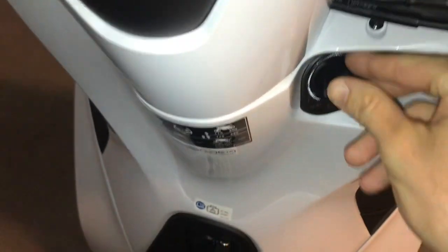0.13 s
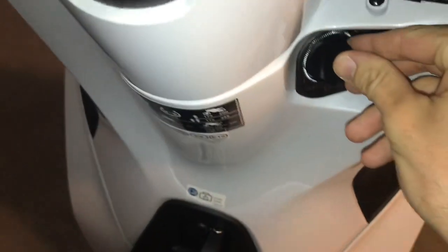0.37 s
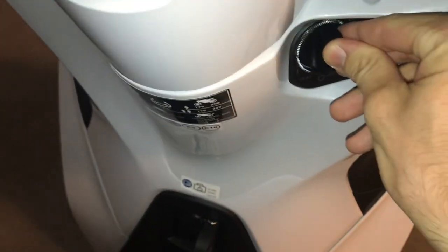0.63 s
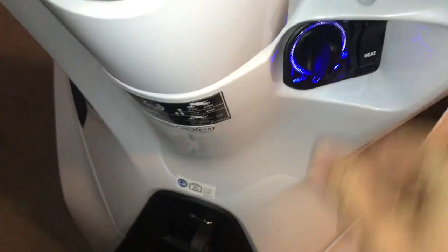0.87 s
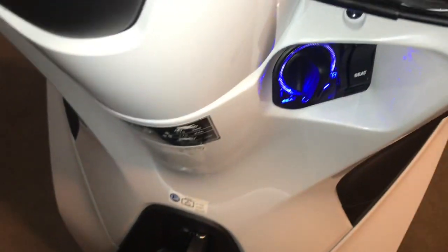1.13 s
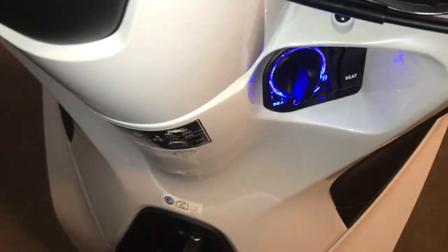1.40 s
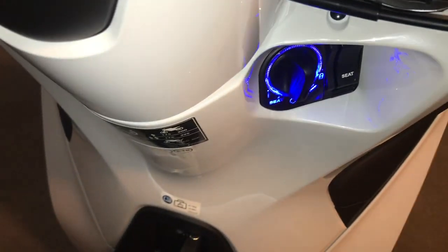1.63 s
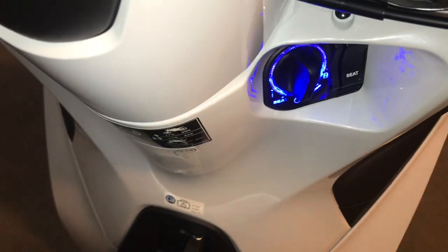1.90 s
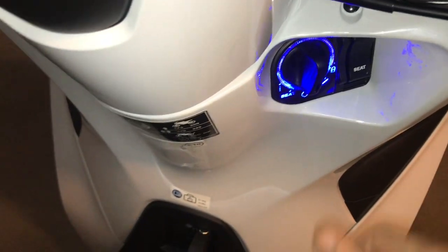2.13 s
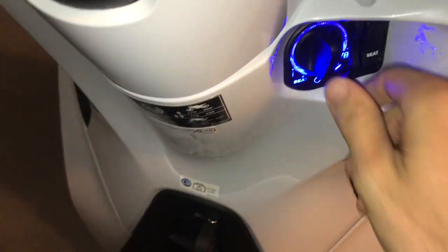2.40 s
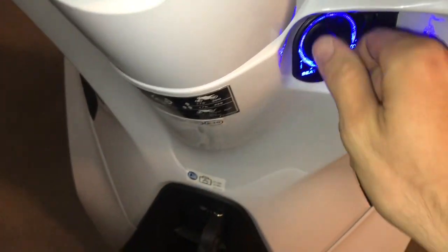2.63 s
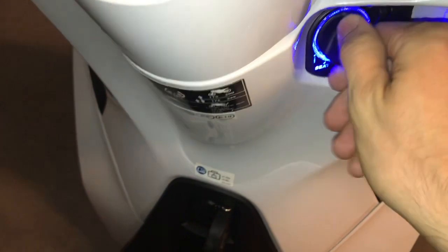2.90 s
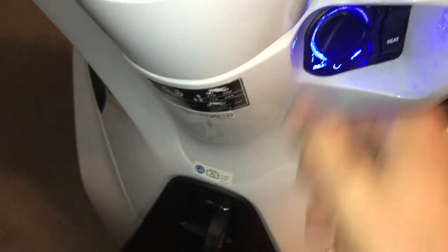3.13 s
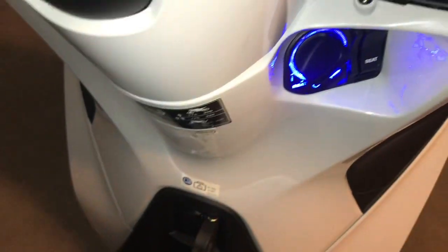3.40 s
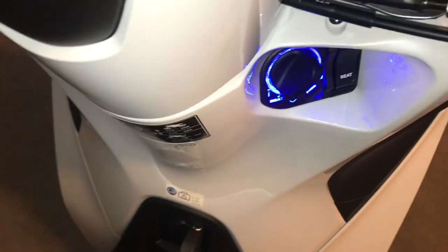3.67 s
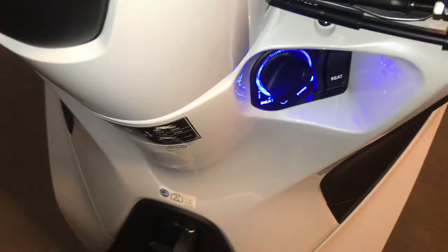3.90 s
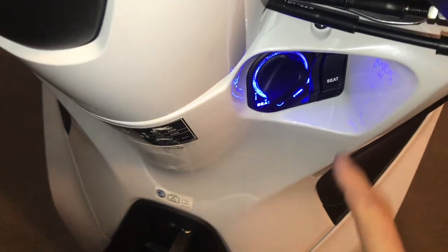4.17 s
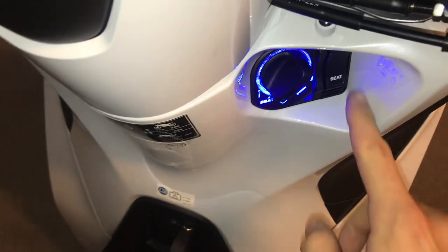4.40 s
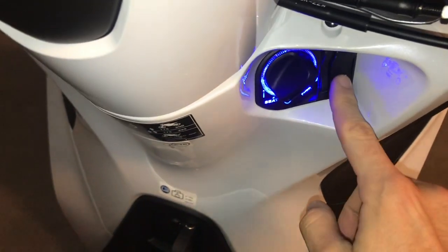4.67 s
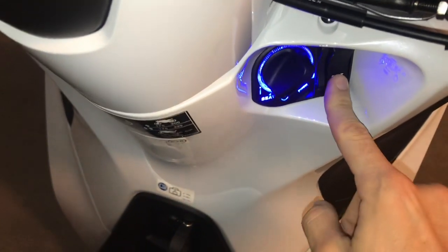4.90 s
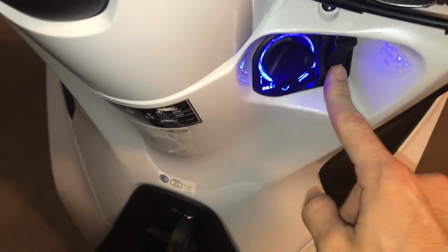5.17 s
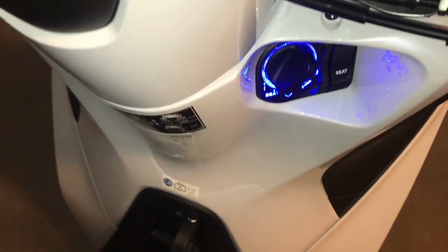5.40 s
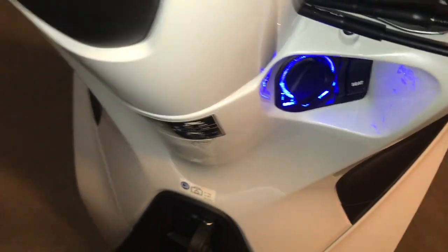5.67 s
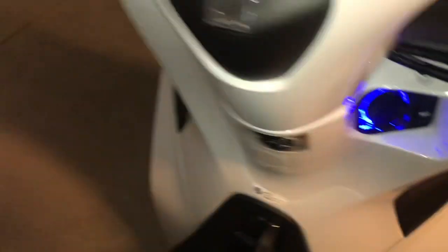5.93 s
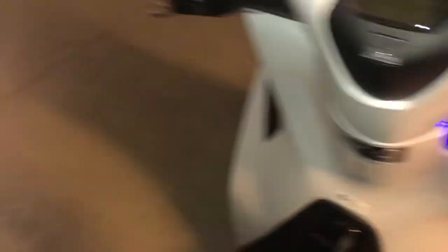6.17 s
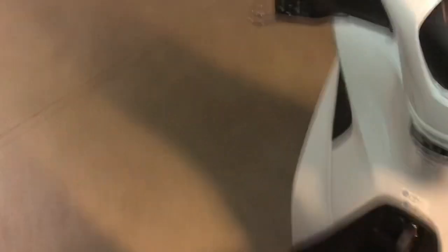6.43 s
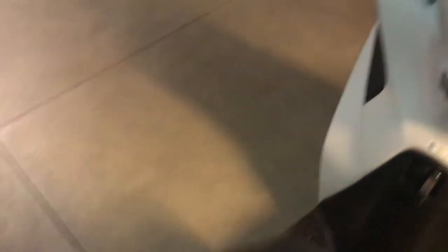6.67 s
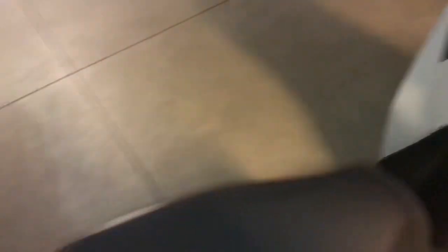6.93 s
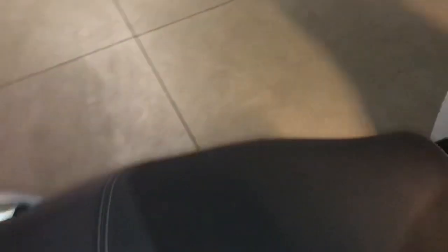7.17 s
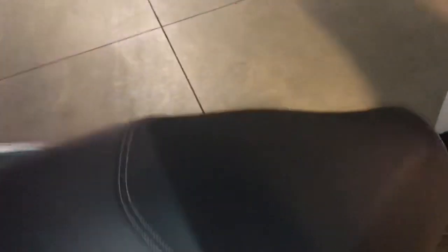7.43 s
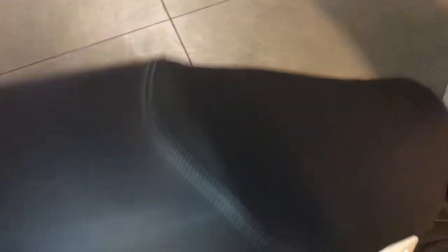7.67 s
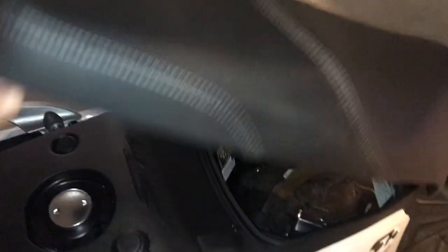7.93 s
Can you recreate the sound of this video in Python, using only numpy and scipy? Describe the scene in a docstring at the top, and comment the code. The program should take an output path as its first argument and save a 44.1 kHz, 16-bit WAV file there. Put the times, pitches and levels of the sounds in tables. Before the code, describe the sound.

A quiet bare garage, heard through one close handheld microphone: very faint distant engine drone, low hum, soft noise and light sleeve rustle. After a tiny touch at 0.2 s, a plastic ignition knob is pushed at about 0.65 s with a sharp click, then turned at 0.8 s with a louder, brighter cluster of clacks; a faint rasp and diffuse room tail fade. Quiet until 2.95-3.0 s, when two more hard clicks turn the knob again. Faint taps come at 4.65-4.75 s. At 5.05 s the seat latch snaps, loudest and fullest, with a springy metallic hiss and a short rub; the button clicks back at 5.3 s. Cloth rustles from 5.5 s, soft knocks and a dull bump fall at 6.2-6.5 s. From 6.6 to 8 s come brushing strokes, rough rubs, low thumps, a brief falling squeak at 7.15 s and a light clack at 7.4 s.

```python
"""In a bare garage, a distant drone, hum and noise floor (shaped noise) run under a sleeve's rustle (flickering noise).
A hand pushes and turns a scooter's plastic ignition knob: clattering contacts ring decaying modes, rasps follow,
and the room answers each click with a soft tail of diffuse noise. Near 5 s the seat button clicks and the latch snaps;
then the seat is lifted: dull low tones, rough rubs of broad noise, strokes on its cover and a falling squeak.
One microphone feeds both channels."""
import sys
import numpy as np
from scipy import signal
from scipy.fft import rfft, irfft
from scipy.io import wavfile
from scipy.ndimage import map_coordinates

SR = 44100
rng = np.random.default_rng(int(sys.argv[2]) if len(sys.argv) > 2 else 0)


def decibels_to_gain(level_db):
    """Convert a level in decibels to a linear amplitude gain (20 dB per decade)."""
    exponent = np.asarray(level_db, float) / 20
    return 10 ** exponent


def bounce(signal):
    """Save signal as a 16-bit WAV file at the path given by the first command-line argument."""
    frames = np.transpose(np.atleast_2d(signal))
    limited = np.clip(frames, -1, 1)
    pcm = np.round(limited * 32767).astype(np.int16)
    wavfile.write(sys.argv[1], SR, pcm)


N = 355446   # samples

# Distant engine drone. Each row: time in seconds, centre in Hz, level in dB.
DRONE = [(0, 66, -64.5), (1.3, 64, -64), (2.5, 76, -64.5), (3.5, 85, -63.5), (4.1, 88, -59.5),
         (4.6, 96, -65.5), (5.0, 102, -61), (6.0, 78, -68.5), (6.6, 67.6, -64.5), (7.5, 71.4, -59.5),
         (8.06, 69, -62)]
DRONE_WAVER_DB = 1
# Distant machinery.
HUM_HZ, HUM_DB, HUM_WAVER_DB = 119, -70, 4.5
# Steady noise floor. Each row: frequency in Hz, relative spectrum level in dB.
FLOOR_SPECTRUM = [(18, -50), (30, -10), (46, -3), (86, -2.5), (134, -9), (153, -18.5), (303, -21.5),
                  (473, -29), (540, -21.5), (649, -20.5), (1130, -18), (1590, -27), (1720, -29.5),
                  (2830, -42.5), (3400, -47), (16000, -52.5)]
FLOOR_DB = -66
HANDLING_DB = -64.5   # hand on the microphone, at rest
# Grip shifts. Each row: start in seconds, length in seconds, level in dB at full swell.
GRIP_SHIFTS = [(6.136, 0.39, -71.5), (6.924, 0.19, -61.5), (7.313, 0.096, -56), (7.438, 0.17, -55),
               (7.883, 0.23, -70.5)]
# Sleeve movements. Each row: time in seconds, fine hiss level in dB.
SLEEVE_MOVES = [
    [(0.0, -64.5), (0.38, -70.5), (0.55, -71)],
    [(1.24, -68), (1.286, -74), (1.988, -79.5), (2.224, -75.5), (2.404, -70.5), (2.516, -68), (2.69, -71.5),
     (2.9, -73.5)],
    [(3.43, -67.5), (3.666, -76.5), (4.01, -78), (4.224, -74), (4.466, -75), (4.702, -77.5), (4.93, -76),
     (5.0, -69)],
    [(5.5, -66), (5.706, -63.5), (5.84, -66), (6.23, -69.5), (6.43, -71)],
    [(6.88, -62.5), (7.0, -64)],
    [(7.46, -69), (7.66, -65)],
    [(8.0, -65.5), (8.06, -69)],
]
# Dull part of the rustle. Each row: frequency in Hz, relative spectrum level in dB.
SWISH_SPECTRUM = [(300, -15), (600, -3.5), (1500, 0), (3000, -3.5), (6000, -5.5), (9000, -16), (16000, -24)]
# Bright part of the rustle. Each row: frequency in Hz, relative spectrum level in dB.
HISS_SPECTRUM = [(2500, -33), (5000, -10.5), (8000, -3.5), (11500, -2), (15000, -1.5), (16500, -8)]
SWISH_OVER_HISS_DB = 5   # sleeve, at its mean level
SWISH_FOLLOWS = 0.96   # share of the sleeve hiss's swing in dB
# Hand and clothes on the seat cover. Each row: start in seconds, length in seconds,
# swish level in dB, fine hiss level in dB, both at full swell.
SEAT_STROKES = [(6.52, 0.1, -70, -64), (6.606, .24, -58.5, -48), (7.022, 0.37, -54.5, -48.5),
                (7.36, 0.18, -57.5, -83), (7.7, 0.1, -63.5, -67), (7.827, 0.16, -61.5, -57),
                (7.974, 0.39, -75, -87)]
STROKE_PEAKEDNESS = 0.87   # power of the half-sine swell
STROKE_GRAB_S = 0.0066
STROKE_HEAD_START = 0.084   # share of the half sine skipped at the start
# Contacts on the knob-and-button panel. Each row: start in seconds, knock in dB, thud over knock in dB,
# hardness in dB gained per brighter family of modes, clatter decay in ms (limited to 8).
KNOB_CONTACTS = [(0.158, -58.5, 9, 3.5, 8.7), (0.5751, -47.5, -7, -0.5, 8), (0.6115, -44, -2, 4, 7.4),
                 (0.6572, -17.5, -11.5, -13.5, 4.4), (0.803, -21.5, -20, 8.5, 2.8),
                 (0.8045, -29.5, -6.5, 10.5, 3.7), (0.8062, -14, -10.5, -5, 2.9),
                 (0.837, -23, -9.5, -1.5, 4.4), (0.848, -35.5, 9, -1, 6.1), (2.9238, -47, -21, 3.5, 14),
                 (2.936, -49, -4, 3, 3), (2.9505, -34, -17, 7, 7), (2.953, -22.5, -26, 4, 6.5),
                 (2.9952, -18, -9.5, -1, 8.7), (2.9985, -23.5, -3.5, 8.5, 2.3), (3.004, -37.5, 12, -6, 1.8),
                 (4.652, -40, -3.5, -15, 13), (4.751, -49.5, -10, -13, 8.7), (5.2934, -37.5, -3.5, -2, 6),
                 (5.31, -35, -10, -16, 3.7), (5.318, -16.5, -18.5, -6, 4.2), (5.3205, -23, -7.5, -8, 6.4),
                 (5.336, -42.5, 5, -8, 2.2)]
# Contacts in the seat latch. Each row: columns as in KNOB_CONTACTS.
LATCH_CONTACTS = [(5.0424, -36, 1, -5, 8), (5.0535, -11.5, -10.5, 0.35, 4.2), (5.0552, -15, -6.5, -1, 6.3),
                  (5.06, -21, -24, -3, 9.9)]
# Contacts on seat and clothes. Each row: columns as in KNOB_CONTACTS.
SEAT_CONTACTS = [(0.363, -78, -5, 13.5, 1.5), (1.3638, -75.5, -3, 10, 1.9), (1.564, -59, 8, -2.5, 4.2),
                 (2.0418, -78, 5, 12, 3), (4.05, -67, 0, 7, 3), (6.201, -53.5, 3, 8.5, 3),
                 (6.44, -49, -3, -2, 3.8), (6.457, -45.5, -4, -1, 6.8), (6.4685, -52, 2.2, 7, 8.7),
                 (6.48, -36.5, 3.5, 1, 6.9), (6.493, -30.5, 6.5, -2.5, 2.6), (7.0264, -61, 23, 9.5, 4),
                 (7.3672, -41.5, -7, -1, 3.4), (7.4011, -29, -10, 1, 20)]
# Modes of the knob panel. Each row: frequency in Hz, level in dB within its family,
# t60 in seconds (limited by plastic loss).
PANEL_MODES = [(226.4, -0.5, 0.094), (296, -0.5, 0.091), (399, 2.5, 0.091), (500, 1, 0.066),
               (629, 8.5, 0.044), (790, -12.5, 0.016), (1020, -6, 0.037), (1150, -7.5, 0.026),
               (1383, 5.5, 0.014), (1517, -5.5, 0.013), (1803, -3.5, 0.02), (2380, -6, 0.012),
               (2800, -5, 0.0052), (3290, -0.5, .012), (3897, -2.5, 0.0095), (4530, -0.5, .006),
               (5270, -0.5, 0.0045), (6410, -8, 0.0024), (7280, -2.5, .008), (8700, -5, 0.014),
               (9340, -3, 0.0044), (12470, -1.5, .005), (15000, -5.5, .004)]
# Modes of the latch. Each row: columns as in PANEL_MODES.
CATCH_MODES = [(98, -1, 0.097), (150, 14.5, 0.05), (235, 12.5, 0.042), (334, 16, 0.035), (520, -1, 0.055),
               (654, 3.5, 0.045), (997, 7, 0.011), (1175, 8.5, 0.01), (1477, 8.5, 0.0099),
               (1990, 6.5, .025), (2710, 6, 0.011), (3750, 13, 0.0058), (5250, 11, 0.0028),
               (5500, -1, 0.0047), (6120, -5, .006), (7760, -0.5, .008), (8900, 8, .01), (9700, -5, .006),
               (10900, 0, .005), (14500, -29, .004)]
# Modes of the seat. Each row: columns as in PANEL_MODES.
CUSHION_MODES = [(176, -12, 0.045), (304, -7.5, 0.022), (610, 10, 0.013), (975, -1, 0.019),
                 (1500, 7, 0.007), (2150, -3, 0.036), (3040, 13, 0.0036), (4320, 1.5, 0.0065),
                 (5800, 5.5, 0.0045), (6940, 4, 0.002), (8560, 8, 0.018), (11600, 5, 0.0074),
                 (14900, 7, 0.0036)]
# Borders in Hz between thud, knock, snap and tick modes.
FAMILY_BORDERS_HZ = [700, 2600, 6000]
# Room response. Each row: frequency in Hz, t60 in seconds, level in dB.
ROOM_BANDS = [(100, 0.75, -2), (300, 0.67, -9), (704, 0.97, -12.5), (1400, 1.5, -17.5), (2520, 0.85, -11.5),
              (5060, 1.1, -15.5), (9000, 0.54, -16), (15000, .8, -16.5)]
TAIL_DIP_S, TAIL_DIP_DB, TAIL_DIP_SPREAD_S = .11, -0.5, 0.014   # the tail dips briefly
TAIL_DROP_S, TAIL_DROP_DB = .41, -2   # the tail sinks suddenly this long after a click
# Parts rasping on after a click: knob detent and latch spring. Each row: start in seconds,
# starting level in dB, resonance in Hz, width in Hz, t60 in seconds.
RASPING_PARTS = [(0.166, -57.5, 1290, 500, 0.35), (0.666, -54, 1240, 320, 1.4),
                 (5.06, -42.5, 8900, 1500, 0.48), (5.06, -46, 5860, 1300, 0.7)]
# Dull bumps of body and seat. Each row: start in seconds, level in dB before decay and build-up,
# tone in Hz, t60 in seconds.
BODY_BUMPS = [(5.056, -39, 60, .11), (6.205, -31, 55.8, 0.075), (6.48, -38, 44.6, 0.13),
              (6.995, -39, 147, 0.13), (7.38, -43, 60, 0.14), (7.469, -42, 150, 0.12)]
# Broad rough rubs as the seat flexes and swings. Each row: start in seconds, length in seconds,
# level in dB at full swell, centre in Hz, width in Hz.
SEAT_RUBS = [(5.13, 0.19, -48.5, 2300, 2600), (5.734, 0.11, -58, 2800, 2400), (6.66, .05, -55, 6500, 3000),
             (7.07, 0.039, -49.5, 4190, 3000), (7.695, 0.15, -55.5, 2900, 1310),
             (7.836, 0.17, -55.5, 2955, 2200)]
SQUEAK_S, SQUEAK_LENGTH_S, SQUEAK_DB = 7.15, .11, -58
SQUEAK_START_HZ, SQUEAK_SAG_HZ_PER_S = 1830, 2600
# Dips of the microphone case. Each row: frequency in Hz, width in Hz, gain in dB.
CASE_DIPS = [(4998, 520, -3.5), (7770, 600, -2.5), (10460, 620, -8.5)]
TOP_CUT_HZ = 16050


def rms_one(x):
    """Scale to unit rms."""
    return x / np.sqrt(np.mean(x ** 2) + 1e-20)


def in_time(rows):
    """Each column after the time as a curve over the samples."""
    time_s, *columns = np.transpose(rows)
    return [np.interp(np.arange(N) / SR, time_s, column) for column in columns]


def at_hz(points, hz, column=1):
    """Read a table on a log-frequency axis."""
    points = np.array(points)
    return np.interp(np.log(hz + 1), np.log(points[:, 0]), points[:, column])


def drift(knots_per_s):
    """Smooth random curve through normal knots of spread 1."""
    knots = rng.standard_normal(400)
    return map_coordinates(knots, [np.arange(N) / SR * knots_per_s], order=3, mode="wrap")


def coloured(spectrum):
    """Noise with the given spectrum, rms 1."""
    hz = np.fft.rfftfreq(N, 1 / SR)
    white = rfft(rng.standard_normal(N))
    return rms_one(irfft(white * decibels_to_gain(at_hz(spectrum, hz)), N))


def wandering_band(hz, width_hz):
    """Noise around a centre that may move: a random complex envelope on a carrier."""
    pole = np.exp(-np.pi * width_hz / SR)
    real, imag = signal.lfilter([1], [1, -2 * pole, pole * pole], rng.standard_normal((2, N)))
    carrier = np.exp(2j * np.pi * np.cumsum(hz) / SR)
    return rms_one(np.real((real + 1j * imag) * carrier))


def stroke(start_s, length_s):
    """Envelope of one movement: it breaks loose, swells and stops."""
    since_s = np.arange(N) / SR - start_s
    progress = np.clip(since_s / length_s, 0, 1)
    swell = np.sin(np.pi * (STROKE_HEAD_START + (1 - STROKE_HEAD_START) * progress))
    return np.clip(since_s / STROKE_GRAB_S, 0, 1) * np.abs(swell) ** STROKE_PEAKEDNESS


def background():
    """Wavering low drone and hum as narrow noise, lumpy handling noise and a steady floor."""
    drone_hz, drone_db = in_time(DRONE)
    drone = decibels_to_gain(drone_db + DRONE_WAVER_DB * drift(7.1)) * wandering_band(drone_hz, width_hz=28)
    hum = decibels_to_gain(HUM_DB + HUM_WAVER_DB * drift(3.1)) * wandering_band(np.full(N, HUM_HZ), width_hz=23)
    grip = decibels_to_gain(HANDLING_DB)
    for start_s, length_s, level_db in GRIP_SHIFTS:
        grip = grip + decibels_to_gain(level_db) * stroke(start_s, length_s)
    rub = coloured([(80, -39.5), (140, 3.5), (300, -3.5), (700, -14.5), (1400, -42)])
    handling = grip * decibels_to_gain(2.5 * drift(18)) * rub
    return drone + hum + handling + decibels_to_gain(FLOOR_DB) * coloured(FLOOR_SPECTRUM)


def rustle():
    """Fabric fibres slipping: dense noise that flickers a little."""
    sleeve_db, = in_time(np.concatenate(SLEEVE_MOVES))
    mean_db = sleeve_db.mean()
    swish = decibels_to_gain(mean_db + SWISH_OVER_HISS_DB + SWISH_FOLLOWS * (sleeve_db - mean_db))
    hiss = decibels_to_gain(sleeve_db)
    for start_s, length_s, swish_db, hiss_db in SEAT_STROKES:
        envelope = stroke(start_s, length_s)
        swish = swish + decibels_to_gain(swish_db) * envelope
        hiss = hiss + decibels_to_gain(hiss_db) * envelope
    dull = swish * decibels_to_gain(2.0 * drift(22)) * coloured(SWISH_SPECTRUM)
    bright = hiss * decibels_to_gain(1.3 * drift(30)) * coloured(HISS_SPECTRUM)
    return dull + bright


def clicks(contacts, modes, snap_db, low_cut_hz):
    """Each contact is a dying clatter of tiny impacts ringing four families of modes: thud, knock, snap, tick."""
    out, t = np.zeros(N + 8192), np.arange(6000) / SR
    hz, mode_db, t60_s = np.transpose(modes)
    longest_s = .085 * (500 / hz) ** 1.3   # plastic damps strongly, more so up high
    t60_s = np.clip(t60_s, .001, longest_s)
    rings = np.sin(2 * np.pi * hz[:, None] * t) * decibels_to_gain(-60 * t / t60_s[:, None])
    rings *= 1 - np.exp(-(t * hz[:, None] / 0.7) ** 2)   # a mode takes a cycle or so to swing up
    rings *= decibels_to_gain(mode_db)[:, None]
    family = np.searchsorted(FAMILY_BORDERS_HZ, hz)
    for start_s, knock_db, weight_db, hardness_db, clatter_ms in contacts:
        # each impact lands elsewhere: new strengths per mode
        impacts = rng.standard_normal((len(hz), 800)) * (rng.random(800) < .12)
        impacts[:, 0] = 5 * (-1) ** np.arange(len(hz))   # strong first impact
        impacts *= np.exp(-1000 * t[:800] / np.clip(clatter_ms, .1, 8))
        sounds = signal.fftconvolve(rings, impacts, axes=1)
        start = round(start_s * SR)
        for k, over_db in enumerate([weight_db, 0, hardness_db + snap_db, 2 * hardness_db]):
            sound = sounds[family == k].sum(axis=0)
            out[start:start + len(sound)] += decibels_to_gain(knock_db + over_db) * sound / np.abs(sound).max()
    # the clicks carry no deep bass
    return signal.sosfilt(signal.butter(4, low_cut_hz, "high", fs=SR, output="sos"), out[:N])


def garage(x):
    """Reflections blur each click: per band, its energy feeds diffuse noise that builds up and dies."""
    step, out = 32, 0   # samples per energy frame
    t = np.arange(0, 1.5, step / SR)
    dip_db = TAIL_DIP_DB * np.exp(-((t - TAIL_DIP_S) / TAIL_DIP_SPREAD_S) ** 2)
    shape_db = dip_db + TAIL_DROP_DB * (t > TAIL_DROP_S)
    build_up = 1 - np.exp(-(t / 0.0034) ** 2)   # walls are metres away
    edges_hz = 70 * 2 ** np.arange(0, 8.1, .5)
    white = rng.standard_normal((2, N))
    for k, (low_hz, high_hz) in enumerate(zip(edges_hz, edges_hz[1:])):
        band = signal.butter(2, [low_hz, high_hz], "band", fs=SR, output="sos")
        click, noise = signal.sosfilt(band, [x + 1e-18, white[k % 2]])
        hz = np.sqrt(low_hz * high_hz)
        t60_s = at_hz(ROOM_BANDS, hz)
        level_db = at_hz(ROOM_BANDS, hz, column=2) + shape_db - 60 * t / t60_s
        decay = (build_up * decibels_to_gain(level_db)) ** 2 * np.log(1e6) / (t60_s * SR)
        energy = np.add.reduceat(click ** 2, np.arange(0, N, step))
        power = np.abs(signal.fftconvolve(energy, decay)[:len(energy)])
        envelope = np.interp(np.arange(N) / step, np.arange(len(power)), np.sqrt(power))
        out = out + rms_one(noise) * envelope
    return out


def rasps():
    """Dense uneven slips heard through one broad resonance, dying away."""
    out, t = np.zeros(N), np.arange(N) / SR
    for start_s, level_db, hz, width_hz, t60_s in RASPING_PARTS:
        slips = rng.standard_normal(N) * (rng.random(N) < .15) * decibels_to_gain(1.3 * drift(40))
        b, a = signal.iirpeak(hz, hz / width_hz, fs=SR)
        buzz = rms_one(signal.lfilter(b, a, signal.lfilter(b, a, slips)))
        since_s = np.maximum(t - start_s, 0)
        out += buzz * (t > start_s) * decibels_to_gain(level_db - 60 * since_s / t60_s)
    return out


def bumps():
    """Heavy parts shift: a soft swing of one low tone."""
    out, t = np.zeros(N), np.arange(N) / SR
    for start_s, level_db, hz, t60_s in BODY_BUMPS:
        since_s = np.maximum(t - start_s, 0)
        tone = np.sin(2 * np.pi * hz * since_s) * (1 - np.exp(-since_s * hz))
        out += tone * decibels_to_gain(level_db - 60 * since_s / t60_s)
    return out


def rubs():
    """Rough rubs of broad noise as the seat flexes and swings."""
    out = np.zeros(N)
    for start_s, length_s, level_db, hz, width_hz in SEAT_RUBS:
        out += decibels_to_gain(level_db) * stroke(start_s, length_s) * wandering_band(np.full(N, hz), width_hz)
    return decibels_to_gain(3.5 * drift(48)) * out


def squeak():
    """Stick-slip: a rough, broken falling tone and its octave."""
    since_s = np.clip(np.arange(N) / SR - SQUEAK_S, 0, SQUEAK_LENGTH_S)
    hz = SQUEAK_START_HZ - SQUEAK_SAG_HZ_PER_S * since_s
    tone = wandering_band(hz, width_hz=200) + decibels_to_gain(-4) * wandering_band(2 * hz, width_hz=260)
    return decibels_to_gain(SQUEAK_DB + 4 * drift(45)) * stroke(SQUEAK_S, SQUEAK_LENGTH_S) * tone


def scene():
    """Everything reaches one microphone; the latch under the seat is further off and stirs the room more."""
    knob = clicks(KNOB_CONTACTS, PANEL_MODES, snap_db=-0.5, low_cut_hz=140)
    latch = clicks(LATCH_CONTACTS, CATCH_MODES, snap_db=-1.0, low_cut_hz=29)
    seat = clicks(SEAT_CONTACTS, CUSHION_MODES, snap_db=5, low_cut_hz=56)
    # the recess beams the knob's treble at the listener, so the room gets less
    shaded_knob = signal.lfilter(*signal.butter(1, 7000, fs=SR), knob)
    # heard through the seat gap
    boxed_latch = signal.sosfilt(signal.butter(4, [200, 10000], "band", fs=SR, output="sos"), latch)
    room = garage(shaded_knob + decibels_to_gain(5.5) * boxed_latch + decibels_to_gain(-8) * seat)
    mix = background() + rustle() + knob + latch + seat + room + rasps() + bumps() + rubs() + squeak()
    return np.tile(mix, (2, 1))


def top_cut(x):
    """Nothing passes above the cut-off."""
    return signal.sosfilt(signal.butter(12, 17130, fs=SR, output="sos"), x)


def record(dry):
    """The microphone case cuts dips into the treble; a steep filter cuts the top."""
    x = dry
    for hz, width_hz, dip_db in CASE_DIPS:
        b, a = signal.iirpeak(hz, hz / width_hz, fs=SR)
        x = x + (decibels_to_gain(dip_db) - 1) * signal.lfilter(b, a, x)
    x = signal.sosfilt(signal.cheby2(16, 35, TOP_CUT_HZ, fs=SR, output="sos"), x)
    return top_cut(x)


dry = scene()
out = record(dry)
bounce(out)
```